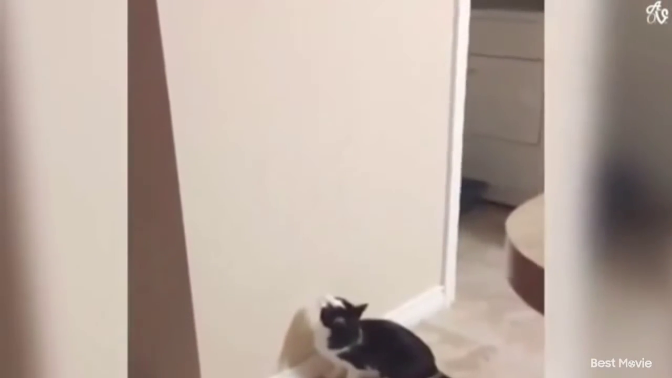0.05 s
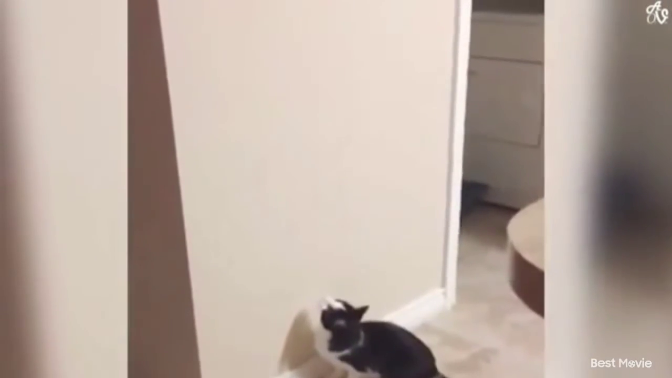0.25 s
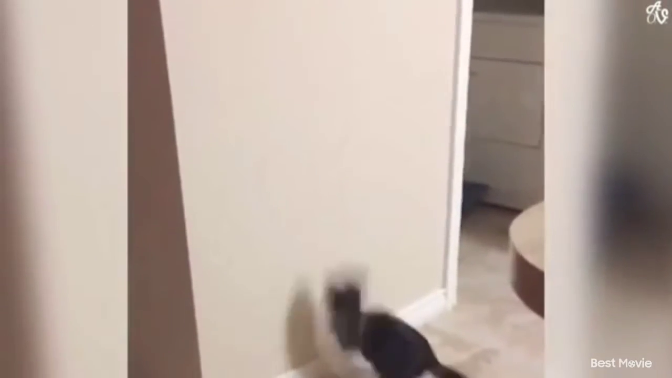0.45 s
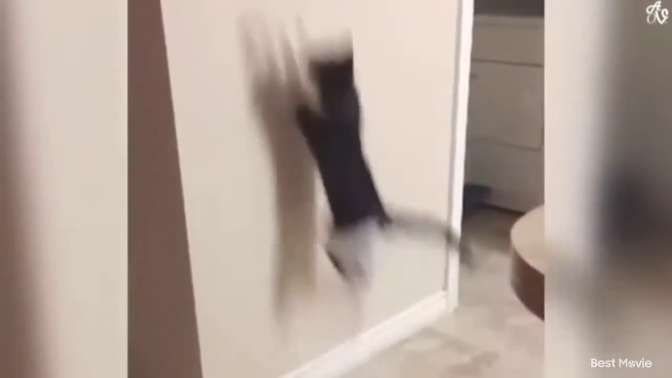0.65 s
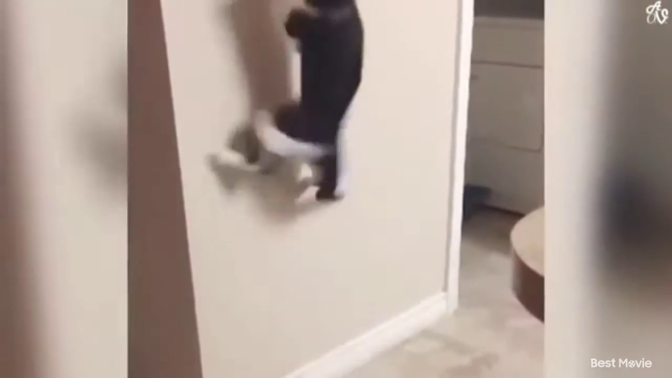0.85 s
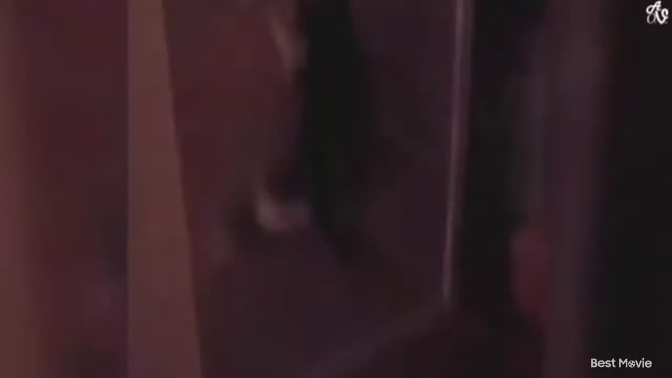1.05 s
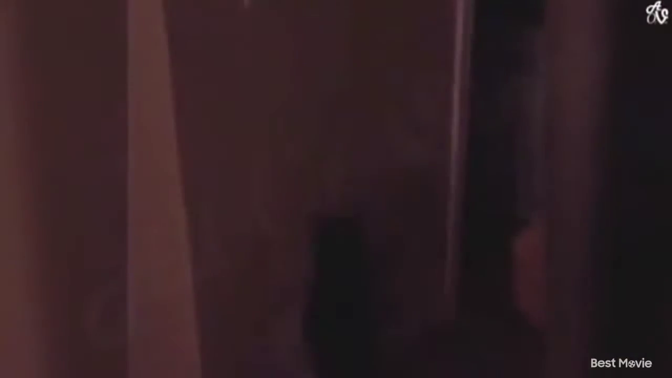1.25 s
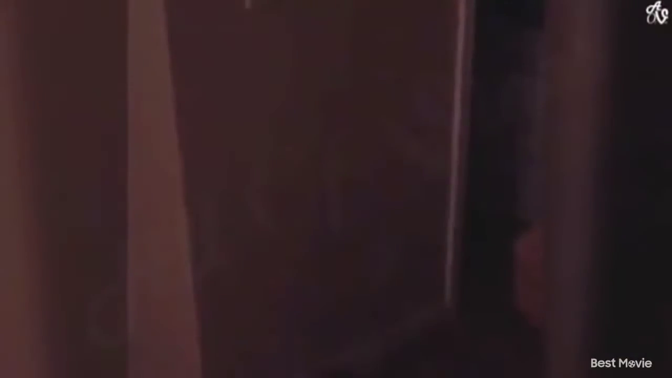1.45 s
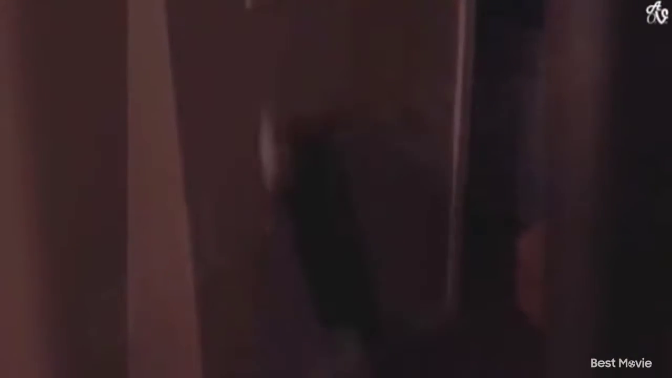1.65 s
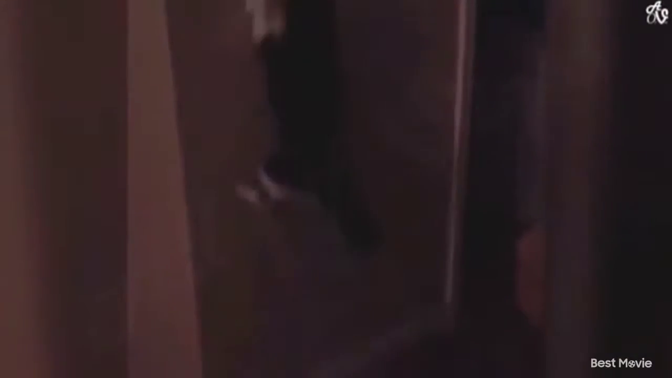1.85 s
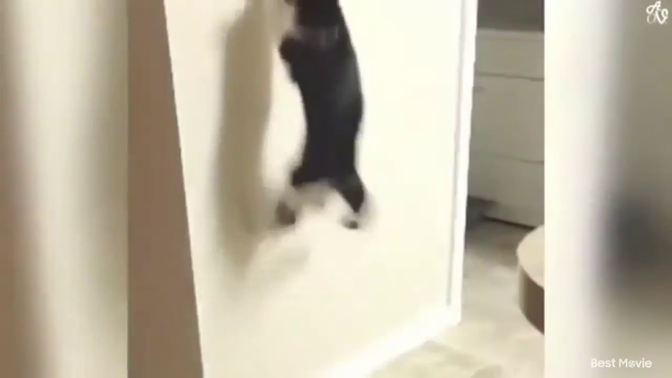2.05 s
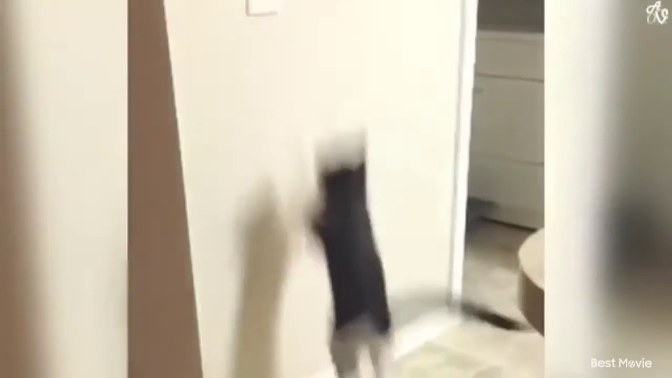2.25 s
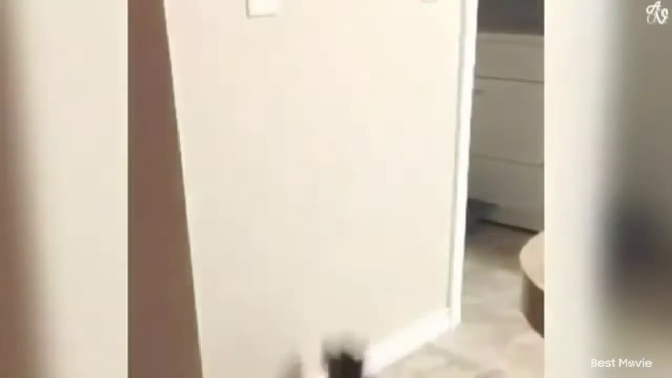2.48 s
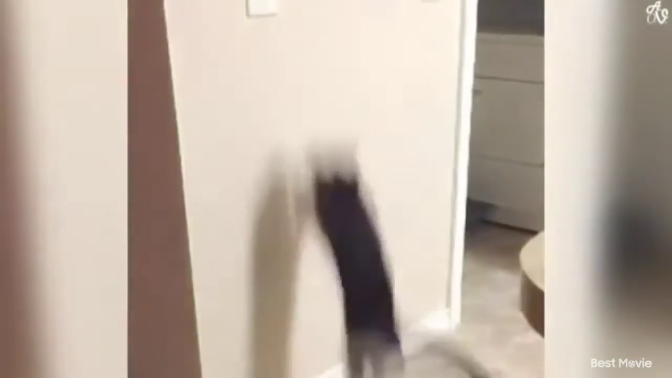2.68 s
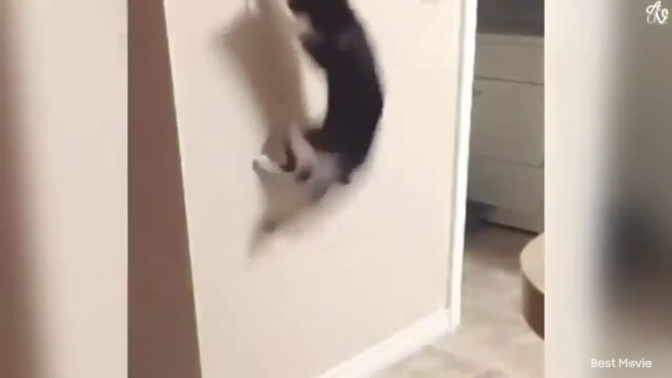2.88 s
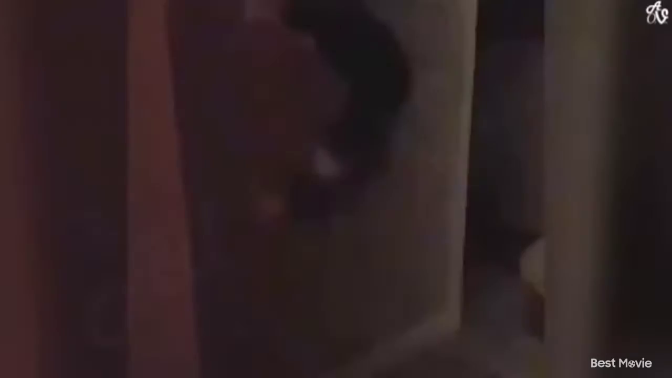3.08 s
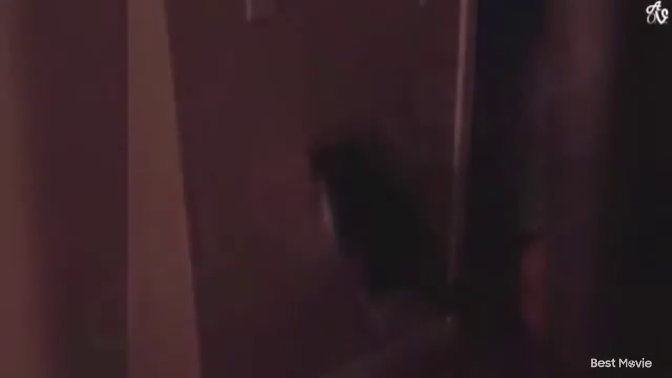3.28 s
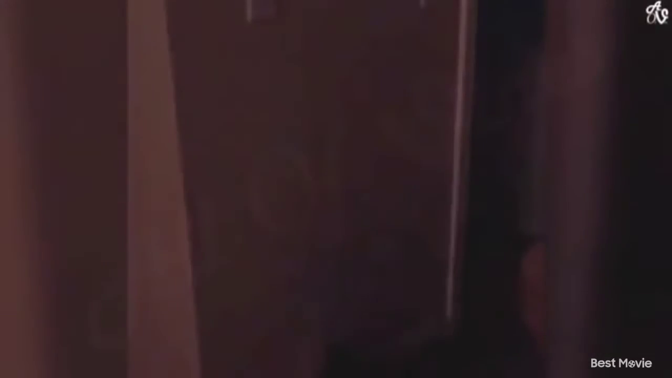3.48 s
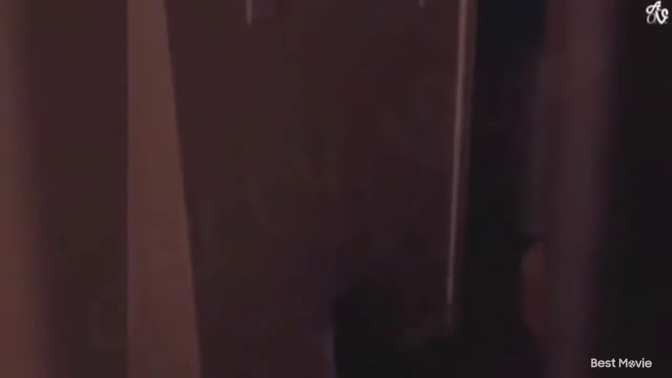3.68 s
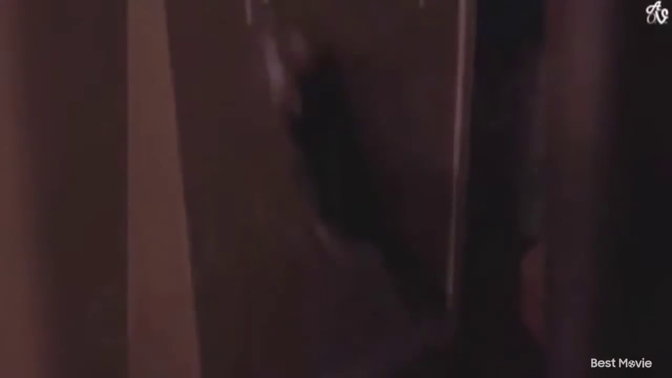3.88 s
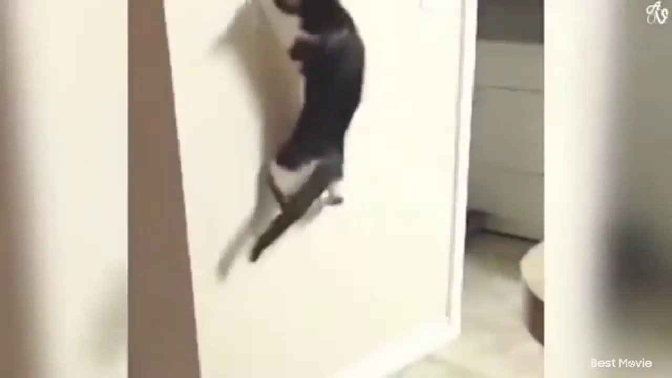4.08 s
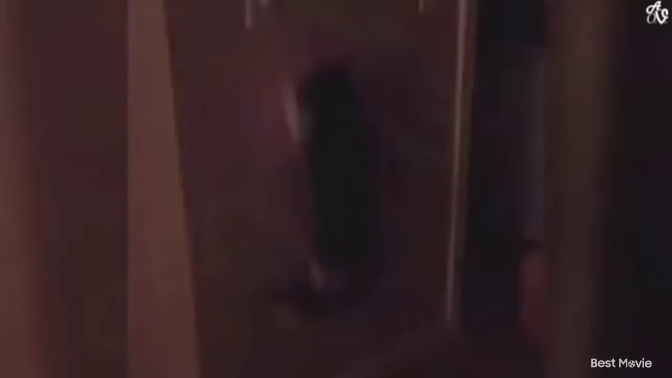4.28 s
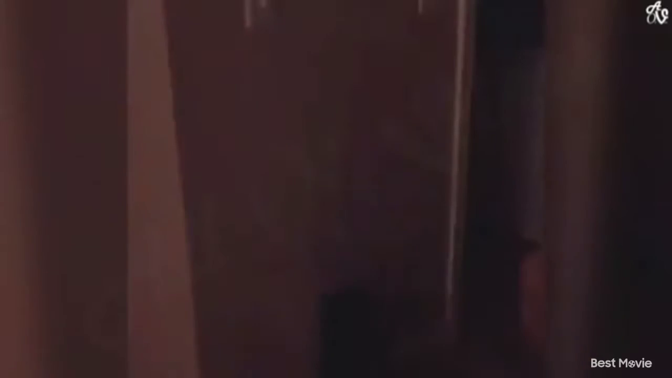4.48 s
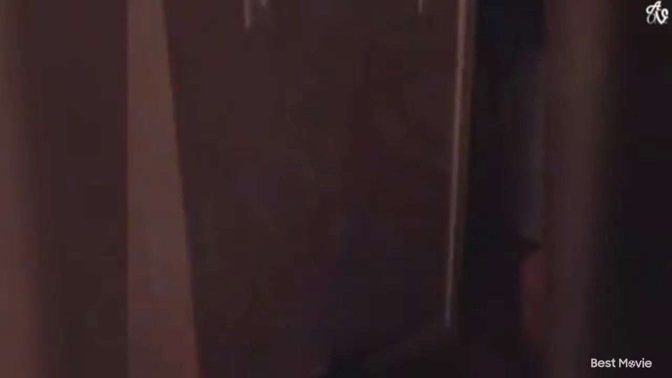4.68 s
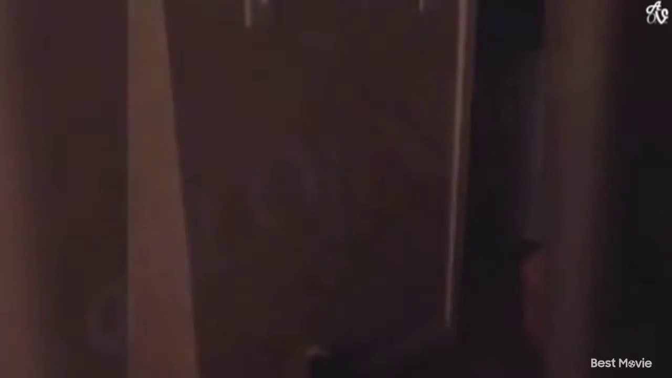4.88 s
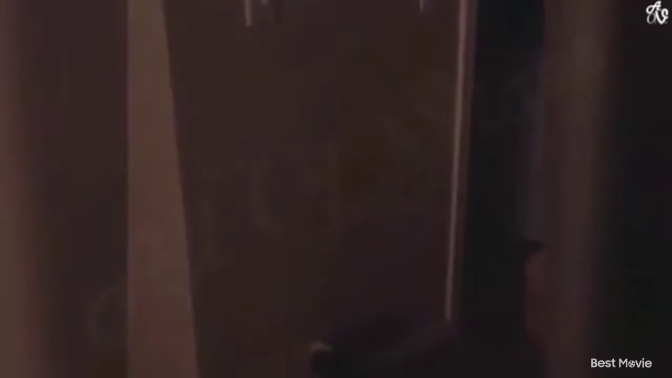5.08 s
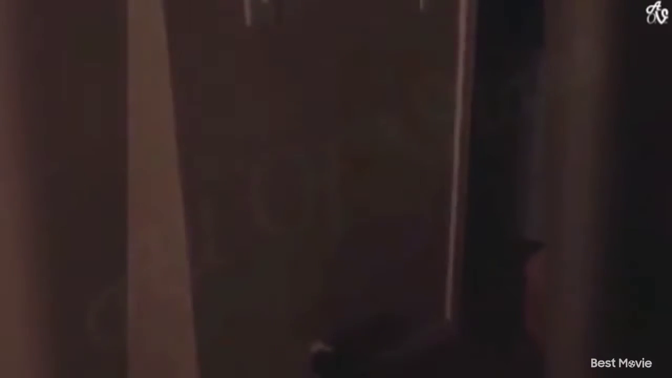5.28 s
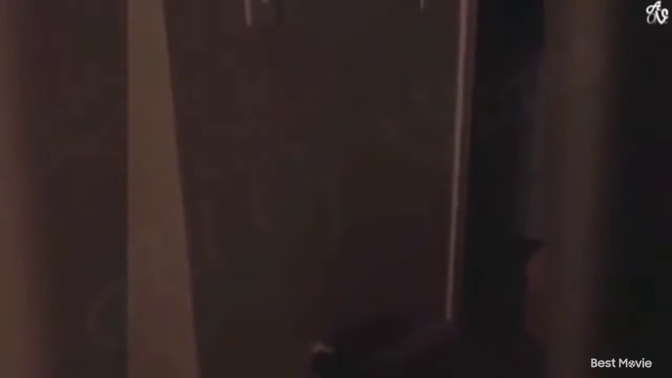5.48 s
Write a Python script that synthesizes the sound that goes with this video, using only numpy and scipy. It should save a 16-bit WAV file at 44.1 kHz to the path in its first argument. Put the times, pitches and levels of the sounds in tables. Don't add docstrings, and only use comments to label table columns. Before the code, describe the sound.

In a small hard room with a low rumble, a cat gathers with faint sliding and a thin squeak, then jumps at a wall five times. Each jump gives dry claw ticks and short scratches, followed by dull double thumps on the floor. The strongest landing comes after a hard slap past the middle. A phone a few metres away hears short, lively echoes.

```python
import sys
import numpy as np
from scipy import signal
from scipy.io import wavfile
from scipy.ndimage import uniform_filter1d

SR = 44100
rng = np.random.default_rng(int(sys.argv[2]) if len(sys.argv) > 2 else 0)


def master_out(mix):
    frames = np.transpose(np.atleast_2d(mix))
    ceiling = np.clip(frames, -1, 1)
    pcm = np.round(ceiling * 32767).astype(np.int16)
    wavfile.write(sys.argv[1], SR, pcm)


def gain_from_db(level_db):
    decades = np.asarray(level_db, float) / 20
    return 10 ** decades


N = 244204
HARD_SLAP_S = 3.43
TIME = np.arange(N) / SR
BLOW_TIME = np.arange(SR // 3) / SR


def unit(x):
    return x / np.sqrt(np.mean(x ** 2))


def band(x, lo_hz, hi_hz, order=2):
    edges = [max(lo_hz, 20), min(hi_hz, .45 * SR)]
    return signal.sosfilt(signal.butter(order, edges, "band", fs=SR, output="sos"), x)


def walk(rate):
    hold = int(SR / rate)
    steps = np.repeat(rng.standard_normal(N // hold + 1), hold)
    slewed = uniform_filter1d(uniform_filter1d(steps, hold), hold)
    return unit(slewed[:N])


def add(track, sound, s):
    i = int(s * SR)
    track[i:i + len(sound)] += sound[:N - i]


def grit(size, spread_db):
    excess = np.minimum(rng.exponential(size=size), 4.5)
    return rng.standard_normal(size) * gain_from_db(spread_db * excess)


def hump(start_s, length_s, rise):
    x = np.clip((TIME - start_s) / length_s, 0, 1)
    return np.sin(np.pi / 2 * np.minimum(x / rise, (1 - x) / (1 - rise))) ** 2


def decay(t, t60_s):
    return np.exp(-np.log(1000) * t / t60_s)


# frequency in Hz, level in dB per Hz.
RUMBLE_SPECTRUM = [(24, -88), (40, -38), (200, -3), (251, -5), (382, -13.5), (412, -11), (541, -16.5),
                   (866, -20.5), (1110, -27.5), (1260, -30), (1420, -28), (6950, -40), (15000, -45.5)]
# time in seconds, level in dB.
RUMBLE_SWELL = [(0.0, -72), (0.11, -64), (0.77, -66.5), (1.08, -63.5), (2.0, -64), (3.4, -65), (3.48, -130),
                (3.6, -65.5), (4.9, -59.5), (5.54, -64)]


def rumble():
    hz, spectrum_db = np.transpose(RUMBLE_SPECTRUM)
    low, hiss = 0, 0
    for centre in 50 * 2. ** np.arange(0, 8.3, 1 / 3):
        noise = unit(band(rng.standard_normal(N), centre / 2 ** (1 / 6), centre * 2 ** (1 / 6)))
        flicker_db = 2.0 * walk(5.5) / (1 + centre / 1200)
        level_db = np.interp(np.log(centre), np.log(hz), spectrum_db) + flicker_db
        part = noise * np.sqrt(centre) * gain_from_db(level_db)
        hiss_share = np.clip(np.log2(centre / 600) / 2, 0, 1)
        low = low + (1 - hiss_share) * part
        hiss = hiss + hiss_share * part
    dull = signal.sosfilt(signal.ellip(6, .3, 30, 12500, fs=SR, output="sos"), hiss)
    hiss = np.where(TIME > HARD_SLAP_S, hiss, dull)
    swell_s, swell_db = np.transpose(RUMBLE_SWELL)
    low_db = np.interp(TIME, swell_s, swell_db)
    steady_hiss_db = np.where(TIME > HARD_SLAP_S, -75.5, -77.5)
    hiss_db = steady_hiss_db + 0.13 * (low_db - np.median(low_db))
    return unit(low) * gain_from_db(low_db) + unit(hiss) * gain_from_db(hiss_db)


# start in seconds, length in seconds, level in dB, treble in dB, bass in dB.
SLIDES = [
    (0.287, 0.62, -79.5, -28, 7.5),
    (1.124, 0.49, -76.5, -9, 6),
    (1.69, 0.22, -81.5, -12, 18),
    (2.17, 0.3, -69, -39, 6.5),
    (3.541, 0.23, -60, -7.5, 14),
    (3.748, 0.38, -71, -7, 16),
    (4.434, 0.15, -71.5, -12, -8),
    (5.094, 0.44, -81, -1, 14),
    (5.39, 0.26, -74, -6, 12),
]


def drag():
    force = grit(N, spread_db=1.0) * gain_from_db(1.7 * walk(40))
    mid = unit(band(force, 600, 1040, order=1))
    treble = unit(band(force, 2460, 5700, order=1))
    bass = unit(band(force, 162, 254, order=1))
    out = np.zeros(N)
    for s, length_s, db, treble_db, bass_db in SLIDES:
        slide = mid + gain_from_db(treble_db) * treble + gain_from_db(bass_db) * bass
        out += hump(s, length_s, rise=0.34) * gain_from_db(db) * slide
    return out


def squeak():
    start_s, length_s, level_db = 0.3, 0.24, -74
    pitch_hz = np.interp(TIME, [start_s, start_s + length_s], [2950, 2550])
    phase = 2 * np.pi * np.cumsum(pitch_hz) / SR
    partials = sum(gain * np.sin(ratio * phase) for ratio, gain in ((1, 0.95), (.85, 0.61), (.56, 0.68)))
    roughness = 0.5 + unit(band(rng.standard_normal(N), 40, 170))
    return gain_from_db(level_db) * hump(start_s, length_s, rise=0.23) * roughness * partials


# frequency in Hz, decay time t60 in seconds.
ROOM_DECAY = [(100, 0.4), (300, 0.38), (800, 0.23), (2000, 0.2), (5000, 0.21), (12000, 0.3)]


def echoes():
    t = BLOW_TIME
    hall_db, hall_longer = -26, 5.3
    hz, t60 = np.transpose(ROOM_DECAY)
    centres = 100 * 2. ** np.arange(0, 7.6, .5)
    noises = []
    for centre in centres:
        noise = band(rng.standard_normal(N // 2), centre / 2 ** .25, centre * 2 ** .25)
        noises.append(unit(noise) * np.sqrt(centre))
    noises = np.array(noises)
    age = np.log(1000) * t / np.interp(np.log(centres), np.log(hz), t60)[:, None]
    fades = np.exp(-age) + gain_from_db(hall_db) * np.exp(-age / hall_longer) * (1 - t / t[-1])
    patches_db = 1.96 * walk(350)

    def tail(build_s):
        start = rng.integers(N // 2 - len(t))
        sparse = gain_from_db(patches_db[start:start + len(t)] * np.exp(-t / 0.072))
        diffuse = np.sum(noises[:, start:start + len(t)] * fades, axis=0)
        return diffuse * sparse * (1 - np.exp(-t / build_s))
    return tail


def strike(force, tail, colour, wet_db):
    direct, wet = colour(force), colour(tail)
    match = np.sqrt(np.sum(direct ** 2) / np.sum(wet ** 2))
    return (direct + gain_from_db(wet_db) * wet * match) / np.abs(direct).max()


# time in seconds, peak in dB, pitch in Hz.
FITTING_RINGS = [(0.317, -54.5, 173), (0.357, -45.5, 156), (0.378, -51, 204), (0.64, -60, 190),
                 (1.092, -49, 2940), (1.100, -48, 2440), (1.602, -39.5, 1217), (1.681, -42, 2090),
                 (1.685, -38.5, 578), (2.106, -47, 2630), (2.285, -53.5, 1026), (2.461, -43.5, 924),
                 (2.462, -33, 2260), (2.476, -41, 420), (2.655, -42, 1500), (3.13, -45.5, 983),
                 (3.158, -44, 964), (3.16, -41, 3136), (3.428, -31, 2226), (3.43, -31.5, 1595),
                 (3.436, -34.5, 680), (3.438, -34, 2395), (3.708, -40, 1420), (3.789, -43, 2370),
                 (4.252, -42, 3980), (4.775, -55, 2860), (4.782, -40, 600), (4.877, -30, 658)]


def rings(tail):
    out, t = np.zeros(N), BLOW_TIME
    for s, db, hz in FITTING_RINGS:
        t60_s = 0.05 * (hz / 1000) ** -0.0067
        ring = np.sin(2 * np.pi * hz * t) * decay(t, t60_s) * np.minimum(t * hz / 1.4, 1)
        sound = strike(ring, tail(0.00047), lambda x: band(x, hz / 1.18, hz * 1.076, order=1), wet_db=-6.5)
        add(out, gain_from_db(db) * sound, s)
    return out


# time in seconds, peak in dB, ring in Hz,
# skid length in seconds, hollow share in dB.
WALL_SKIDS = [(0.769, -52, 1520, 0.005, 3), (1.046, -50, 4660, 0.0038, -8), (1.066, -38, 1900, 0.019, -3.5),
              (1.0869, -33, 1570, 0.003, -25), (1.103, -37.5, 2470, 0.0093, -16),
              (1.2937, -43.5, 1680, 0.013, -3), (1.944, -53, 3630, 0.0047, 2),
              (2.09, -36.5, 2280, 0.005, -23), (2.1044, -30.5, 2220, 0.0079, -13.5),
              (2.1656, -30.5, 3330, .0017, -4.5), (2.217, -33.5, 1410, 0.0072, -8),
              (2.286, -45.5, 2110, 0.0077, 1), (2.4571, -21.5, 2370, 0.0045, -6),
              (2.465, -19.5, 2620, .0035, -14), (1.258, -55, 2770, .005, -13),
              (4.231, -35, 3040, 0.0098, -27), (4.2542, -27.5, 1820, 0.0035, -12.5),
              (4.515, -33.5, 1380, 0.01, -8.5)]
# time in seconds, peak in dB, ring in Hz,
# skid length in seconds, hollow share in dB.
FLOOR_SKIDS = [(1.597, -27, 1430, 0.011, 9), (1.624, -28.5, 2390, 0.0079, -3),
               (1.678, -34, 1860, 0.0043, -6), (2.649, -34.5, 1320, 0.0015, 2),
               (2.737, -33, 1750, 0.0069, -0.5), (3.704, -21.5, 1530, 0.009, 7),
               (3.766, -36, 1590, 0.0061, -10), (3.783, -22.5, 1830, 0.0032, -2.5),
               (4.778, -51, 2500, 0.0047, 14), (4.866, -31, 2570, 0.0013, 4),
               (4.8695, -25.5, 1750, 0.0034, -6.5)]
# time in seconds, peak in dB, ring in Hz,
# skid length in seconds, hollow share in dB.
PLATE_SKIDS = [
    (3.1125, -52.5, 2200, 0.013, -5),
    (3.129, -35.5, 2800, 0.018, -10),
    (3.156, -25, 3270, 0.0041, -24),
    (3.164, -28, 3600, 0.0026, -23),
    (3.4025, -39.5, 1570, 0.0098, 1),
    (3.4265, -21, 2080, 0.0034, -14),
    (3.436, -27.5, 1400, 0.0023, -5),
    (4.126, -49, 1850, 0.0025, 1),
]


def claws(tail):
    out, t = np.zeros(N), BLOW_TIME
    surfaces = ((WALL_SKIDS, -24), (PLATE_SKIDS, -19), (FLOOR_SKIDS, -30))
    touches = [(*row, bright_db) for rows, bright_db in surfaces for row in rows]
    for s, db, hz, skid_s, hollow_db, bright_db in touches:
        envelope = np.exp(-t / skid_s) * (1 - np.exp(-t / (2.6 * skid_s)))
        force = unit(grit(len(t), spread_db=5.0)) * envelope
        spots_hz = np.minimum(hz * 2 ** rng.uniform(-0.64, 0.72, size=2), 9000)

        def colour(x):
            paint = band(x, hz / 1.93, hz * 1.594, order=3)
            paint = paint - gain_from_db(bright_db + 7.5) * band(x, 3730, 6960, order=1)
            for spot_hz in spots_hz:
                paint = paint + gain_from_db(-16.5) * band(x, spot_hz / 1.03, spot_hz * 1.03, order=1)
            cavity = band(x, 500.0, 956)
            return paint + gain_from_db(hollow_db + 8.5) * cavity
        add(out, gain_from_db(db - 7.0) * strike(force, tail(skid_s + 0.00033), colour, wet_db=0.5), s - .002)
    return out


# time in seconds, peak in dB, pitch in Hz.
CLAW_CATCHES = [(1.0696, -33, 2100), (1.0895, -45, 1810), (1.2962, -41, 1650), (1.3077, -68, 1560),
                (1.603, -27, 1530), (1.625, -26.5, 1870), (1.6365, -37, 3400), (1.6797, -26, 2120),
                (2.0999, -25, 2710), (2.12, -37, 1850), (2.1655, -27.5, 3670), (2.4614, -25, 2430),
                (2.74, -30, 2140), (3.1298, -35, 4500), (3.1594, -22.5, 3130), (3.4269, -23.5, 1620),
                (3.7086, -30, 2560), (4.1244, -56, 1610), (3.7767, -29, 1850), (4.2315, -46, 2770),
                (4.2445, -30.5, 1870), (4.2519, -20, 3600), (4.5192, -34, 2560), (4.778, -34, 3160),
                (4.8722, -26.5, 1900)]


def ticks(tail):
    out, t = np.zeros(N), BLOW_TIME
    for s, db, hz in CLAW_CATCHES:
        sound = strike(np.exp(-t / .0001), tail(0.0026), lambda x: band(x, hz / 1.51, hz * 1.045), wet_db=3.0)
        add(out, gain_from_db(db - 8.5) * sound, s)
    return out


# time in seconds, peak in dB, push in Hz, knock share in dB, late swell in dB.
LANDINGS = [(1.6, -33, 213, -9, -12), (1.628, -26, 150, -10, -14), (1.684, -22, 266, -11.5, -7.5),
            (2.094, -54.5, 203, 1.5, -21), (2.473, -53.5, 388, 8.5, -1), (2.656, -33, 163, -9, -17),
            (2.745, -27.5, 263, -20, -8.5), (3.147, -55.5, 266.5, 0.5, -6), (3.433, -30.5, 178, 1.5, -7.5),
            (3.568, -42.5, 238, -27, -3), (3.712, -19, 395, -13, -11), (3.788, -14.5, 195, -34, -3),
            (4.236, -57.5, 188.4, 2.5, -13), (4.291, -51.5, 178.3, -6, -23), (4.786, -33, 155, -15.5, 2.5),
            (4.878, -19, 256, -11.5, -3.5), (5.5, -53, 189, -16, -6)]
# frequency in Hz, level in dB, decay time t60 in seconds, arrival in seconds.
BOOM_MODES = [(133, -21, 0.4, 0.013), (138.8, 3, 0.221, 0.0045), (167.5, 4.5, 0.08, 0.0255),
              (206.1, -5.5, 0.36, 0.0329), (242.8, -4, 0.22, 0.0292), (250, 12.5, 0.067, 0.0036),
              (309.3, -14, 0.35, 0.0035), (375, -21, 0.4, 0.005), (388, 10.5, 0.073, 0.0022),
              (420, 2, 0.038, 0.00622), (450, -18, 0.071, 0.01)]


def thumps(tail):
    out, t = np.zeros(N), BLOW_TIME
    swell = np.exp(-((t - 0.041) / 0.0057) ** 2 / 2) * np.sin(2 * np.pi * 206.6 * t)
    for s, db, hz, knock_db, swell_db in LANDINGS:
        contact_s = 0.0035 * gain_from_db(0.58 * (-26 - db))
        shape = t / contact_s * np.exp(1 - t / contact_s)
        room = tail(0.0042)
        push = strike(shape * np.sin(2 * np.pi * hz * t), room, lambda x: band(x, 145, 467), wet_db=-1.0)
        knock = strike(shape * rng.standard_normal(len(t)), room, lambda x: band(x, 393, 877), wet_db=-4.5)
        add(out, gain_from_db(db - 1) * push + gain_from_db(db + knock_db + 4.5) * knock, s - .004)
        add(out, gain_from_db(db + swell_db) * swell, s)
        shares_db = 2.0 * rng.standard_normal(len(BOOM_MODES))
        for (mode_hz, mode_db, t60_s, late_s), share_db in zip(BOOM_MODES, shares_db):
            ring = np.sin(2 * np.pi * mode_hz * t) * decay(t, min(t60_s, .3)) * (1 - np.exp(-t / 0.011))
            match = 1 / np.sqrt(1 + (np.log2(mode_hz / hz) / 0.43) ** 2)
            add(out, gain_from_db(db - 7.5 + mode_db + share_db) * match * ring, s + late_s)
    return out


def scene():
    tail = echoes()
    mix = rumble() + drag() + squeak() + rings(tail) + claws(tail) + ticks(tail) + thumps(tail)
    return mix[None]


def band_limit(x):
    return signal.sosfilt(signal.butter(12, 15590, fs=SR, output="sos"), x)


def record(dry):
    x = signal.sosfilt(signal.butter(3, 110, "high", fs=SR, output="sos"), dry)
    bumps = band(np.abs(band(x, 288, 8000)), 55, 78, order=1)
    x = x + gain_from_db(-15) * bumps
    x = signal.sosfilt(signal.ellip(8, .2, 60, 15300, fs=SR, output="sos"), x)
    x = x + np.where(TIME > HARD_SLAP_S, -0.0009, -0.00004)
    return band_limit(x)


dry = scene()
out = record(dry)
master_out(out)
```